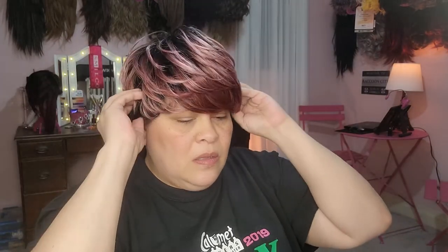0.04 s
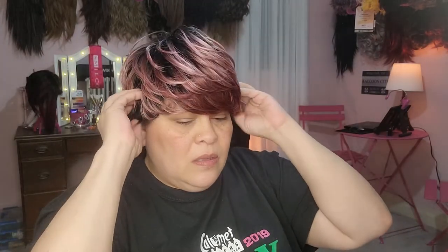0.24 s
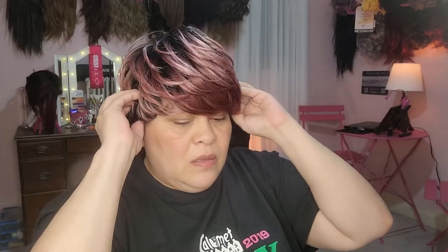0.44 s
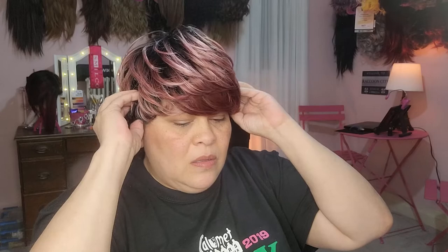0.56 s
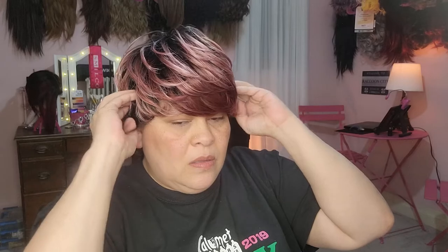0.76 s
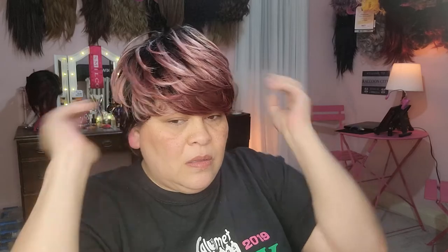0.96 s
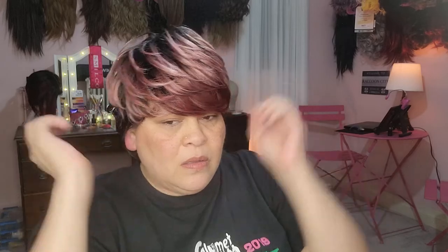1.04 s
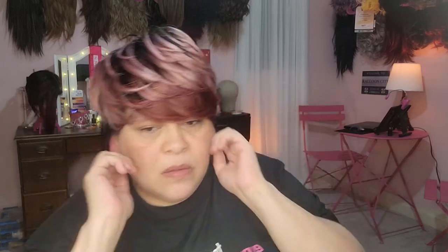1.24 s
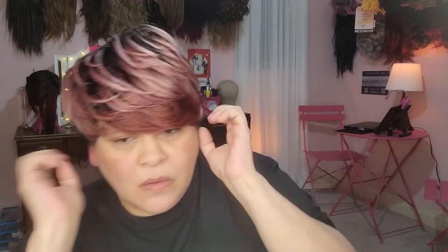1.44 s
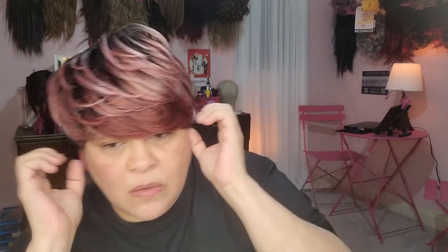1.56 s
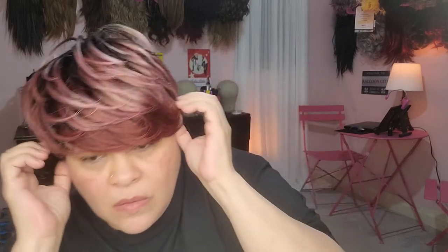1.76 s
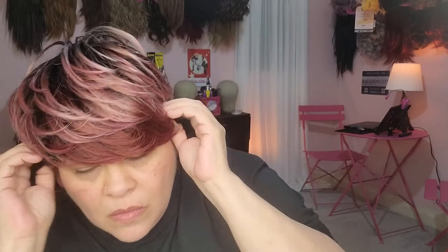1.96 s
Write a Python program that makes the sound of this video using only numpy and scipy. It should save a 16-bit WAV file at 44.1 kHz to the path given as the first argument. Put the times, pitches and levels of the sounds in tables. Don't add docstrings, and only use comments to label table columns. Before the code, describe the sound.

A synthetic wig rustles and rubs as hands settle it, after a small knock and click

```python
import sys
import numpy as np
from scipy import signal
from scipy.fft import rfft, irfft
from scipy.io import wavfile
from scipy.ndimage import uniform_filter1d

SR = 44100
rng = np.random.default_rng(int(sys.argv[2]) if len(sys.argv) > 2 else 0)


def gain_from_db(level_db):
    decades = np.asarray(level_db, float) / 20
    return 10 ** decades


def log_audio(samples):
    frames = np.atleast_2d(samples).T
    limited = np.clip(frames, -1, 1)
    pcm = np.round(limited * 32767).astype(np.int16)
    wavfile.write(sys.argv[1], SR, pcm)


N = 88200


def at_hz(points, hz):
    table_hz, value = np.transpose(points)
    return np.interp(np.log(hz + 1e-9), np.log(table_hz), value)


def rms_one(x):
    return x / np.sqrt(np.mean(x ** 2) + 1e-20)


def noise():
    return rng.standard_normal(N)


def colour(x, spectrum):
    size = 4096
    hz = np.arange(size // 2 + 1) * SR / size
    first_hz, first_db = spectrum[0]
    ends = [(first_hz / 2, first_db - 20)] + list(spectrum)
    cepstrum = irfft(np.log(gain_from_db(at_hz(ends, hz))), size)
    cepstrum[1:size // 2] *= 2
    cepstrum[size // 2 + 1:] = 0
    response = irfft(np.exp(rfft(cepstrum)), size)
    return signal.fftconvolve(x, rms_one(response) / np.sqrt(size))[:len(x)]


def drift(rate_hz):
    r = np.exp(-2 * np.pi * rate_hz / SR)
    settled = signal.lfilter([1], [1, -2 * r, r * r], rng.standard_normal(2 * N))[N:]
    return rms_one(settled)


def peak(x, hz, width_hz):
    r = np.exp(-np.pi * width_hz / SR)
    poles = [1, -2 * r * np.cos(2 * np.pi * hz / SR), r * r]
    return signal.lfilter([(1 - r * r) / 2, 0, (r * r - 1) / 2], poles, x)


def ring(s, db, hz, t60):
    clicks = np.full(N, 1e-18)
    clicks[(np.atleast_1d(s) * SR).astype(int)] = gain_from_db(db)
    r = gain_from_db(-60 / (max(t60, .003) * SR))
    w = 2 * np.pi * hz / SR
    return signal.lfilter([0, np.sin(w)], [1, -2 * r * np.cos(w), r * r], clicks)


def burst(start, rise, t60):
    t = np.arange(N) / SR - start
    return np.clip(t / rise, 0, 1) ** 2 * gain_from_db(-60 * np.clip(t - rise, 0, 2) / t60)


def place(x, pan):
    tilt = at_hz(pan, np.arange(N // 2 + 1) * SR / N) / 2
    return irfft(rfft(x) * gain_from_db(np.array([tilt, -tilt])), N)


def fan_hum():
    t = np.arange(N) / SR
    # time in seconds, hum level in dB
    hum_levels = [(0, -55), (.2, -58), (.36, -53.5), (.5, -60.5), (.56, -70.5), (.9, -70.5), (1.0, -100),
                  (1.38, -83), (1.5, -69), (1.74, -64), (2, -71)]
    # time in seconds, level in dB
    beat_levels = [(0, -81), (.15, -64), (.4, -63.5), (.62, -70.5), (.74, -90), (.88, -69), (1.0, -70),
                   (1.28, -72), (1.38, -79), (1.55, -63), (1.72, -73.5), (1.82, -88), (1.92, -61), (2, -61)]
    hum_db = np.interp(t, *np.transpose(hum_levels))
    mains_db = -75 + 0.65 * (hum_db - hum_db.mean()) + 1.8 * drift(17)
    hum = np.sqrt(2) * gain_from_db(hum_db) * np.sin(2 * np.pi * 108 * t)
    mains = gain_from_db(mains_db) * np.sin(2 * np.pi * 58.7 * t)
    beat = gain_from_db(np.interp(t, *np.transpose(beat_levels))) * np.sin(2 * np.pi * 217 * t)
    return hum + mains + beat


def fan_chirps():
    t = np.arange(N) / SR
    # time in seconds, level in dB
    turns = [
        (.57, -61),
        (1.254, -53),
        (1.945, -52),
    ]
    # frequency in Hz, level in dB, lag in seconds, hold in seconds
    lines = [(3450, -10, .045, .015), (3845, -3, .012, .04), (4205, -10, .045, .03), (4411, -5, .025, .085),
             (4475, -12, .05, .05), (4610, -11, .05, .03), (4795, -5, .01, .025), (5160, -5, -.008, .04),
             (6140, -5, -.006, .005)]
    rise_s, fall_s = 0.0095, 0.053
    out = np.zeros(N)
    for hz, line_db, lag, hold in lines:
        corners = np.cumsum([0, rise_s, hold, fall_s])
        shape = sum(gain_from_db(db) * np.interp(t - s - lag, corners, [0.13, 1.0, 1.0, 0.23]) for s, db in turns)
        tone = np.sin(2 * np.pi * hz * t + 1.2 * drift(30))
        out += shape * gain_from_db(line_db + 2 * drift(40)) * tone
    return out


def fan():
    t = np.arange(N) / SR
    # time in seconds, rumble level in dB, hiss level in dB
    load = [
        (0, -59, -55.5),
        (.5, -60, -53.5),
        (.7, -59, -55),
        (.92, -60, -53),
        (1.0, -61, -54),
        (1.15, -59.5, -52.5),
        (1.24, -58.5, -51.5),
        (1.32, -58.5, -54),
        (1.4, -55.5, -51),
        (2, -57.5, -52.5),
    ]
    # frequency in Hz, density in dB per Hz
    air = [(35, -16.5), (60, -1.5), (130, -14.5), (300, -9.5), (1800, -16.5), (2400, -16.5), (8000, -14),
           (16000, -16.5)]
    # frequency in Hz, density in dB per Hz
    hiss_spectrum = [(3300, -19), (3500, -13), (4500, -7), (5500, -3), (6200, -5.5), (7300, -8),
                     (7900, -17), (8200, -49.5)]
    # frequency in Hz, width in Hz, level in dB
    edges = [(5490, 45, -12), (5655, 35, -13), (5720, 150, -6), (5785, 35, -13), (5950, 60, -15),
             (6680, 80, -15)]
    # frequency in Hz, width in Hz, level in dB
    overtones = [(852.3, 35, -74.5), (1882, 42, -76.5), (753, 44, -77.5)]
    # frequency in Hz, left minus right in dB
    room_pan = [(60, -6), (500, -1.5), (1000, -14), (15000, -7.5)]
    s, rumble_db, hiss_db = np.transpose(load)
    whistling = sum(gain_from_db(db + 2 * drift(5.7)) * rms_one(peak(noise(), hz, width)) for hz, width, db in edges)
    hiss = gain_from_db(np.interp(t, s, hiss_db) + 0.16 * drift(3.9)) * (colour(noise(), hiss_spectrum) + whistling)
    out = gain_from_db(np.interp(t, s, rumble_db)) * colour(noise(), air) + fan_hum()
    for hz, width_hz, db in overtones:
        out += gain_from_db(db) * rms_one(peak(peak(noise(), hz, width_hz), hz, width_hz))
    return place(out, room_pan) + hiss + fan_chirps()


def knock_ringing():
    # time in seconds, strength in dB
    strikes = [
        (.2105, -11),
        (.2131, 0),
        (.2166, -4),
    ]
    # frequency in Hz, level in dB, t60 in seconds, lag in seconds
    body_modes = [(224.3, -11.5, 0.26, 0.00578), (355, -7, 0.2, 0.0039), (502.4, -26, 0.13, .008),
                  (604, -9, 0.11, 0.022), (772, -7, 0.11, 0.00075), (876, -19.5, 0.3, 0.00782),
                  (930, -3, 0.075, .013), (1149, -9.5, 0.12, 0.019), (1265, -21, 0.29, .006),
                  (1560, -14, 0.18, 0.00593), (1763, -16, 0.23, .006), (2330, -11, 0.1, 0.011),
                  (3084, -10, 0.13, .004), (4312, -37, 0.13, 0.0095)]
    # frequency in Hz, level in dB, t60 in seconds
    clip_modes = [(775, -7, 0.025), (1264, 6, .028), (1398, 0, 0.017), (1740, 0.5, 0.015),
                  (2390, -9.5, 0.037), (3200, -19, 0.037), (4120, -23, 0.012), (4500, -12, 0.022),
                  (5300, -2.5, 0.036), (6800, -23, .015), (9030, -12, .01)]
    body_db, clip_db = -24.5, -24
    hardest_s = strikes[1][0]
    out = np.zeros(N)
    for k, (hz, db, t60, lag) in enumerate(body_modes):
        out += ring(hardest_s + lag, db + body_db, hz, t60) * (-1) ** k
    at, strength = np.transpose(strikes)
    for k, (hz, db, t60) in enumerate(clip_modes):
        out += ring(at + 1 / hz, db + clip_db + strength, hz, t60) * (-1) ** k
    return out


def knock_tail(start_s):
    # frequency in Hz, density in dB per Hz
    spectrum = [(47, -33), (80, -4.5), (180, -10), (355, -5.5), (909, -2.5), (2280, -2.5), (5240, -10.5),
                (9000, -24.5), (15000, -43)]
    # frequency in Hz, t60 in seconds
    decay = [(100, 0.48), (500, 0.26), (2000, 0.18), (8000, 0.24)]
    swell_s, swell_cycles, tail_db = 0.0062, 2.3, -27.5
    white = rng.standard_normal((2, N))
    edges = 70 * 2 ** np.arange(0, 8, .75)
    tail = np.zeros(N)
    for k, (lo, hi) in enumerate(zip(edges, edges[1:])):
        band = signal.sosfilt(signal.butter(2, [lo, hi], "band", fs=SR, output="sos"), white[k % 2])
        t60 = at_hz(decay, np.sqrt(lo * hi))
        tail += band * gain_from_db(1.5 * drift(36)) * burst(start_s - swell_s / 2, swell_s + swell_cycles / hi, t60)
    return colour(gain_from_db(tail_db) * tail, spectrum)


def knock():
    # contact time in seconds, level in dB
    contacts = [(.2100, -27), (.2118, -25), (.2135, -16), (.2148, -15), (.2166, -14), (.2193, -20),
                (.2215, -23), (.2243, -23), (.2305, -23), (.2345, -24), (.2400, -27)]
    # frequency in Hz, density in dB per Hz
    crack_spectrum = [(500, -1.5), (1300, 3), (2000, -6), (3000, 11), (5400, -2), (7000, -7), (9500, -9),
                      (15000, -21)]
    # frequency in Hz, left minus right in dB
    knock_pan = [(100, -2.5), (600, -2.1), (3100, -2.4), (3900, -.1), (6500, -.1), (7600, -2.5),
                 (14000, -4.5)]
    crack_db, crack_t60_s, centres_s = -10, .006, .232
    rise_s = crack_t60_s / 10
    crack = sum(gain_from_db(db + crack_db) * burst(s - rise_s, rise_s, crack_t60_s) for s, db in contacts)
    out = knock_ringing() + colour(crack * noise(), crack_spectrum) + knock_tail(contacts[0][0])
    late = np.clip((np.arange(N) / SR - centres_s) * 100, 0, 1)
    return place(out * (1 - late), knock_pan) + out * late


def soft_pat():
    # frequency in Hz, level in dB, t60 in seconds
    pat_modes = [(345, -52, .06), (395, -54, .06)]
    return sum(ring(1.386 + 1 / hz * np.arange(3), db - 6, hz, t60) for hz, db, t60 in pat_modes)


def snap():
    # frequency in Hz, density in dB per Hz
    spectrum = [(500, -49), (1000, -21), (1500, -15), (3000, -15), (3800, -11), (6200, -2.5), (7320, 2.5),
                (9240, -12), (16000, -8)]
    # time in seconds, strength in dB
    touches = [
        (.9590, -6),
        (.9612, 0),
        (.9778, -1),
        (.9912, -8),
    ]
    # frequency in Hz, level in dB, t60 in seconds
    modes = [(890, -50, .06), (945, -57, .05), (835, -58, .1), (1810, -60, .08), (2205, -55, .04),
             (2600, -57, .04), (3800, -49, .025), (5250, -49, .02), (6650, -42, .03), (7350, -42, .03)]
    # frequency in Hz, left minus right in dB
    snap_pan = [(300, -2.5), (1000, -3), (2800, -4), (3600, -.1), (6700, -.1), (7600, -2.6), (12000, -5.5)]
    start_s, rise_s, t60_s, tail_t60_s = .9556, .0075, 0.034, .18
    snap_db, tail_db = -28.5, -13.5
    dulling_db = 2
    out = colour(gain_from_db(snap_db) * burst(start_s, rise_s, t60_s) * noise(), spectrum)
    tail = gain_from_db(snap_db + tail_db) * burst(start_s, 2 * rise_s, tail_t60_s) * noise()
    at, strength = np.transpose(touches)
    late = at > start_s + 2 * rise_s
    for hz, db, t60 in modes:
        octaves = np.log2(hz / modes[0][0])
        out += ring(at, db + strength - late * dulling_db * octaves, hz, t60)
    return place(out + soft_pat(), snap_pan) + colour(tail, spectrum)


def grains():
    grains_per_s, spread_db = 5000, 2
    sizes = gain_from_db(spread_db * np.minimum(rng.exponential(1, N), 5)) * noise()
    born = rng.random(N) < grains_per_s * gain_from_db(1.2 * drift(40)) / SR
    return rms_one(sizes * born + 0.61 * noise())


def finger_rub():
    # frequency in Hz, width in Hz, level in dB
    rub_peaks = [(1510, 130, -5), (2170, 140, 2), (3200, 1000, -6)]
    # frequency in Hz, left minus right in dB
    rub_pan = [(1500, -5.5), (3000, -0.5), (4000, -6)]
    start_s, length_s, rub_db = 0.746, 0.19, -54.5
    slips = grains()
    rub = sum(gain_from_db(db) * peak(slips, hz, w) * (-1) ** k for k, (hz, w, db) in enumerate(rub_peaks))
    shape = np.sin(np.pi * np.clip((np.arange(N) / SR - start_s) / length_s, 0, 1))
    return place(gain_from_db(rub_db) * shape * rms_one(rub), rub_pan)


def wig():
    t = np.arange(N) / SR
    # time in seconds, rub level in dB, brightness of the fine fibres in dB
    hands = [(0.32, -64.5, -1), (0.632, -77.5, -11), (0.848, -60.5, 6), (0.95, -64.5, 6), (0.96, -81, -10),
             (0.992, -59, 8), (1.054, -65.5, 8.5), (1.306, -63.5, 9), (1.382, -56.5, 12), (1.432, -53, 3.5),
             (1.568, -49.5, 0), (1.678, -51, -1.5), (1.76, -51.5, 4.5), (1.87, -52.5, 4.5), (2.0, -57, 2)]
    # frequency in Hz, density in dB per Hz
    cap_spectrum = [(88, -60), (150, -10), (405, -4.5), (777, -8), (1080, -5.5), (1680, -6), (1990, -3),
                    (5570, 0), (9000, -16), (11700, -40), (19800, -120)]
    # frequency in Hz, width in Hz, level in dB
    cap_peaks = [(1070, 150, -10), (1330, 200, -12), (1650, 180, -9), (2560, 610, -17)]
    # time in seconds, level in dB
    press = [
        (1.3, -6),
        (1.44, -2),
        (1.5, 3),
        (1.56, 0),
        (1.62, 1),
        (1.68, 0),
        (1.76, 1),
        (1.9, 5),
        (1.94, -3),
    ]
    # frequency in Hz, density in dB per Hz
    fibre_spectrum = [(2500, -8), (5000, -34), (8000, 1), (12000, -6.5), (16000, -7.5)]
    # frequency in Hz, left minus right in dB
    wig_pan = [(600, -7), (1000, -1.6), (2000, -.8), (3000, 0), (14000, 0)]
    cap_db, fibre_db = 0.5, -6
    s, level, bright = np.transpose(hands)
    level, bright = np.interp(t, s, level), np.interp(t, s, bright)
    slide = grains()
    hollow = sum(gain_from_db(db) * rms_one(peak(slide, hz, width)) for hz, width, db in cap_peaks)
    pressed = gain_from_db(np.interp(t, *np.transpose(press))) * hollow
    cap = gain_from_db(level + cap_db + .5 * drift(6.7)) * (colour(slide, cap_spectrum) + pressed)
    fibres = gain_from_db(level + bright + fibre_db) * colour(grains(), fibre_spectrum)
    return place(cap + fibres, wig_pan) + finger_rub()


def scene():
    return fan() + knock() + snap() + wig()


def low_pass(x):
    return signal.sosfilt(signal.butter(12, 16640, fs=SR, output="sos"), x)


def record(dry):
    least_db, band_hz, cutoff_hz = 1.8, 690, 15800
    hz, _, z = signal.stft(dry, SR, nperseg=1024)
    mono = z.mean(axis=0)
    band = np.where(hz < band_hz, hz * 4 // band_hz, 3 + hz // band_hz)
    gain = np.zeros(mono.shape)
    for k in np.unique(band):
        power = (np.abs(z[:, band == k]) ** 2).sum(axis=1)
        left, right = uniform_filter1d(power, size=4, axis=1)
        pan = 10 * np.log10(left / right)
        gain[band == k] = gain_from_db(pan * (np.abs(pan) > least_db))
    pair = np.array([2 * gain * mono / (1 + gain), 2 * mono / (1 + gain)])
    x = signal.istft(pair, SR, nperseg=1024)[1][:, :N]
    x = signal.sosfilt(signal.butter(4, 45, "high", fs=SR, output="sos"), x)
    x = signal.sosfilt(signal.cheby2(12, 45, cutoff_hz + 700, fs=SR, output="sos"), x)
    return low_pass(x)


dry = scene()
out = record(dry)
log_audio(out)
```